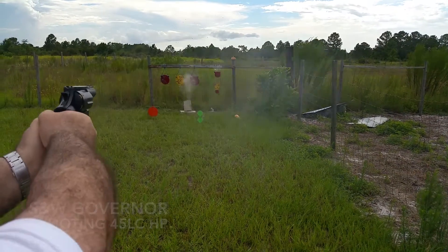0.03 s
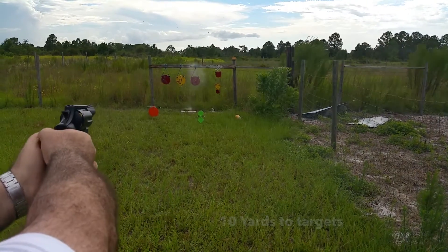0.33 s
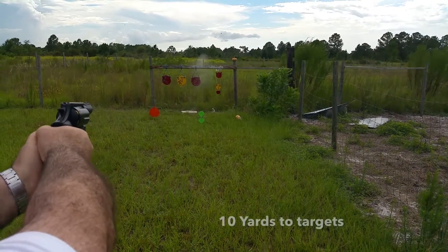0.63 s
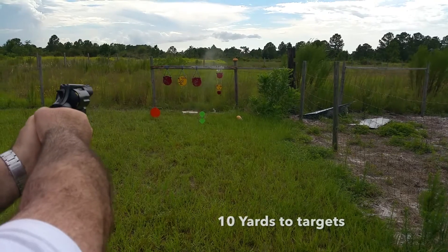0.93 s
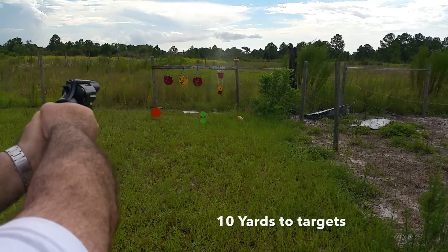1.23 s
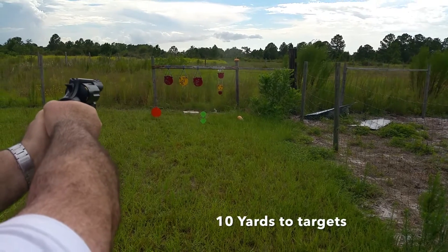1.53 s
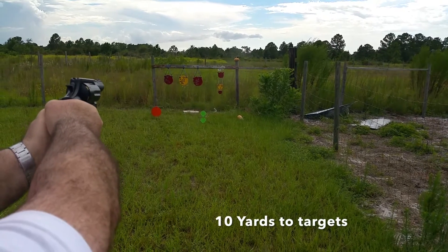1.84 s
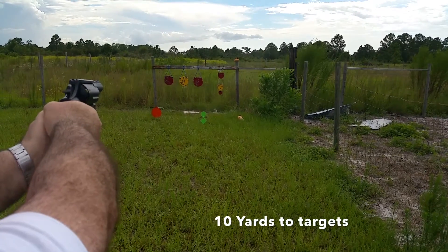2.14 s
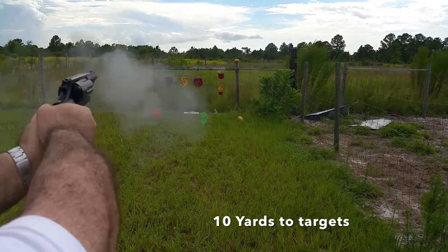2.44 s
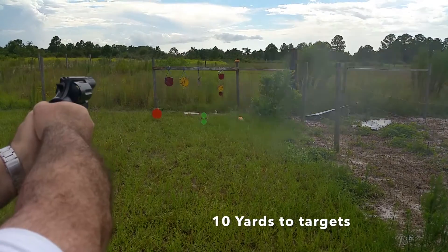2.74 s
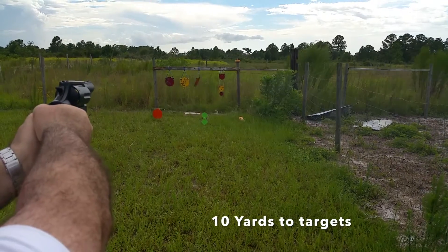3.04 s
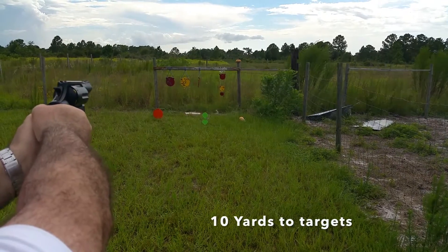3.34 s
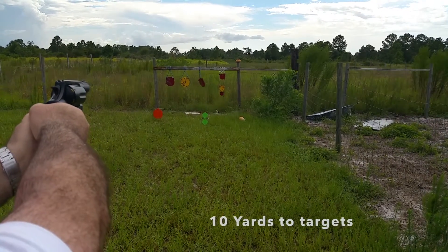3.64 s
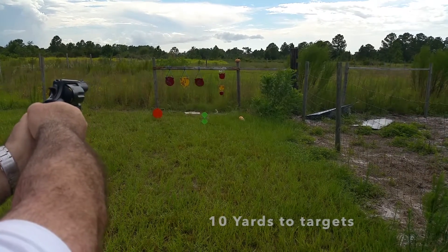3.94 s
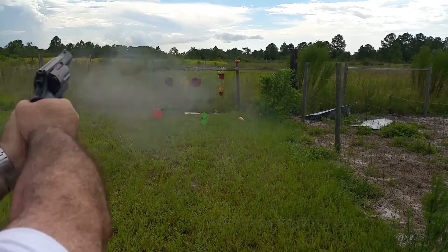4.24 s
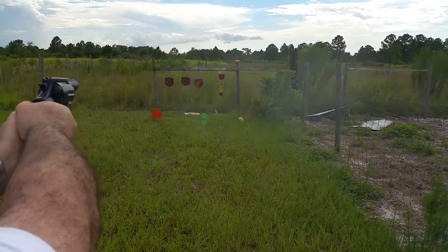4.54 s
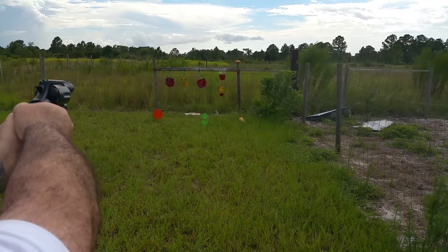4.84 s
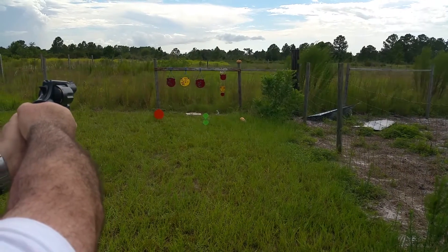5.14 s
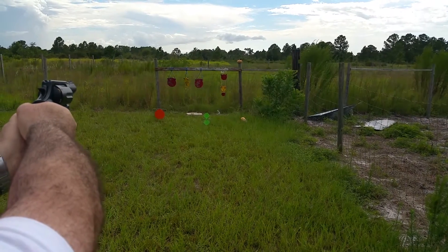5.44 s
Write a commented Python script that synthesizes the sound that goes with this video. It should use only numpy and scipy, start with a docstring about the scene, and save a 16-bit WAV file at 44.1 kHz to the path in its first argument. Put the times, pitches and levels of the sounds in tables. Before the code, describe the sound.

Two revolver shots outdoors, each followed by a ringing steel target, with small gun clicks and wind on the microphone.

```python
"""A revolver shot, fired just before the start, echoes off the brush and far trees of an open field.
Two more shots follow, with clicks of the action between. Their bullets splash on hanging steel plates,
which ring and twist on their chains. Wind buffets the left microphone port, and the camera's
gain control lifts the quiet about a second after each shot."""
import sys
import numpy as np
from scipy import signal
from scipy.fft import rfft, irfft
from scipy.io import wavfile
from scipy.ndimage import uniform_filter1d

SR = 44100
rng = np.random.default_rng(int(sys.argv[2]) if len(sys.argv) > 2 else 0)


def log_audio(samples):
    """Write samples as a 16-bit WAV file to the path given in sys.argv[1]."""
    # one column per channel
    frames = np.atleast_2d(samples).T
    # limit to full scale, then quantise
    limited = np.clip(frames, -1, 1)
    pcm = np.round(limited * 32767).astype(np.int16)
    wavfile.write(sys.argv[1], SR, pcm)


N = 246078
TIME = np.arange(N) / SR


def amp(db):
    """Decibels to gain."""
    return 10 ** (np.asarray(db) / 20)


def unit_rms(x):
    """Scales to rms 1."""
    return x / np.sqrt(np.mean(x ** 2) + 1e-20)


def curves(rows, t):
    """Every column of a table at the times t."""
    times, *columns = np.transpose(rows)
    return [np.interp(t, times, column) for column in columns]


def seconds(length):
    """A time axis."""
    return np.arange(int(length * SR)) / SR


def panned(db):
    """Gains of the two microphone ports, the left louder by db."""
    return unit_rms(amp([[db / 2], [-db / 2]]))


def add(mix, start, sound):
    """Mixes in a stereo sound at start seconds; what falls outside is lost."""
    at = round(start * SR)
    sound = sound[:, max(-at, 0):]
    part = mix[:, max(at, 0):][:, :sound.shape[1]]
    part += sound[:, :part.shape[1]]


def white_pair(n, likeness):
    """White noise at two ports, correlated by likeness."""
    left, other = rng.standard_normal((2, n))
    return np.array([left, likeness * left + np.sqrt(1 - likeness ** 2) * other])


def noise(n, colour, likeness):
    """Stereo noise of rms 1, its spectrum drawn through (Hz, dB) points."""
    hz, db = np.transpose(colour)
    spectrum_db = np.interp(np.log(np.fft.rfftfreq(n, 1 / SR) + 1), np.log(hz + 1), db)
    return unit_rms(irfft(rfft(white_pair(n, likeness)) * amp(spectrum_db), n))


def wobble(t, top_hz):
    """Irregular wavering of rms 1, different at each port."""
    rates = top_hz * np.geomspace(.2, 1, 8)[:, None, None]
    coarse = t[::64]
    slow = np.sin(2 * np.pi * (rates * coarse + rng.random((8, 2, 1)))).sum(0)
    return unit_rms(np.array([np.interp(t, coarse, port) for port in slow]))


def swell(t, rise_s, hold_s, fall_db):
    """Rises, holds until hold_s, then loses fall_db for each tenfold of time."""
    return np.minimum(t / rise_s, 1) * amp(-fall_db * np.log10(np.maximum(t / hold_s, 1)))


def burst(db, hz, t60, skirt_db, likeness):
    """A short dying puff of noise around one frequency."""
    t = np.arange(8192) / SR
    colour = [(hz / 8, 2 * skirt_db), (hz / 1.3, 0), (hz * 1.3, 0),
              (hz * 3, skirt_db), (hz * 20, 2 * skirt_db)]
    return amp(db - 60 * t / t60) * noise(len(t), colour, likeness)


# The blast's two colours at the microphone. Each row: frequency in Hz, relative level in dB.
CRACK_SPECTRUM = [(60, -31), (200, -10.5), (2000, -2), (4500, -2), (6200, -3), (7900, -10), (14700, -7.5),
                  (16000, -22.5)]
BOOM_SPECTRUM = [(30, -39), (70, -20), (250, -12), (520, 2), (1200, -4), (1700, -1.5), (3000, -13.5),
                 (5500, -10), (7300, -25.5), (16000, -22.5)]
def muzzle_blast(crack_db=1, crack_t60=.11, boom_db=.2):
    """A bright crack, then a boom that holds through its bounce off the ground."""
    t = np.arange(12000) / SR
    crack = noise(len(t), CRACK_SPECTRUM, likeness=.1) * amp(crack_db - 60 * t / crack_t60)
    boom = noise(len(t), BOOM_SPECTRUM, likeness=.16) * amp(boom_db)
    boom *= swell(t, rise_s=.0047, hold_s=.018, fall_db=55)
    return (crack + boom) * np.minimum(t / .001, 1)


# Scatter from the grass and brush. Each row: frequency in Hz, relative level in dB.
BRUSH_SPECTRUM = [(30, -43), (70, -10), (250, -2), (650, 0.5), (1200, 3.5), (2000, 4.5), (3400, 1.5),
                  (5900, 3.5), (7300, -5.5), (16000, -13.5)]
# Belts of bushes and trees farther out, each a soft wash.
# Each row: delay in seconds, relative level in dB, rise and t60 in seconds.
TREE_BELT_WASHES = [(.285, -35, 0.029, 0.18), (0.601, -66, 0.26, 2.5), (.92, -65, 0.057, 2.4)]
def field_scatter(brush_db=-22, patchy_db=2, flutter_db=2.5, air_loss_db_per_s=20):
    """The field answers a bang with lumpy scatter that loses treble the farther it has travelled."""
    t = seconds(1.8)
    hz, times, bands = signal.stft(noise(len(t), BRUSH_SPECTRUM, likeness=.067), SR, nperseg=256)
    patches = uniform_filter1d(rng.standard_normal(bands.shape[1:]), size=10, axis=0)
    patches = unit_rms(uniform_filter1d(patches, size=4, axis=1))
    flutter = unit_rms(uniform_filter1d(rng.standard_normal(len(times)), size=3))
    lumps = unit_rms(amp(patchy_db * patches + flutter_db * flutter))
    air_gain = amp(-air_loss_db_per_s * times * (hz[:, None] / 10000) ** 2)  # rate given at 10 kHz
    scatter = signal.istft(bands * lumps * air_gain, SR, nperseg=256)[1][:, :len(t)]
    near = amp(brush_db) * swell(t, rise_s=.04, hold_s=.12, fall_db=53.5)
    far = [np.clip((t - delay) / rise, 0, 1) * amp(db - 60 * np.maximum(t - delay - rise, 0) / t60)
           for delay, db, rise, t60 in TREE_BELT_WASHES]
    return scatter * np.linalg.norm([near, *far], axis=0)


# The revolver, near the microphone. Each row: start in seconds, blast gain in dB, scatter gain in dB.
REVOLVER_SHOTS = [(-0.072, -6.5, 1.5), (2.517, -8, 1.5), (4.2893, -7, 1.5)]
# Single echoes off the target stand, fence and trees, nearest first.
# Each row: delay in seconds, level in dB, centre in Hz, t60 in seconds.
SINGLE_ECHOES = [(.0535, -5, 750, .028), (.078, -20.5, 1200, 0.26), (.086, -19.5, 556.4, 0.044),
                 (.141, -20, 3003, 0.014), (0.2953, -25.5, 1150, 0.017), (.348, -37, 1020, 0.039),
                 (0.479, -49.5, 1600, 0.073), (0.531, -40.5, 1980, .025), (0.867, -56.5, 3280, 0.034),
                 (.923, -60, 3500, .055), (0.963, -51, 1850, 0.031), (1.039, -57, 1820, 0.023),
                 (1.131, -61, 3230, 0.038), (1.222, -62, 2847, 0.029), (1.479, -64, 1620, 0.023)]
def revolver():
    """Each blast reaches the microphone directly, then by way of the field and its hard surfaces."""
    out = np.zeros((2, N))
    for start, blast_db, scatter_db in REVOLVER_SHOTS:
        shot = amp(scatter_db) * field_scatter()
        add(shot, 0, amp(blast_db) * muzzle_blast())
        for delay, db, hz, t60 in SINGLE_ECHOES:
            add(shot, delay, burst(db, hz, t60, skirt_db=-31, likeness=.067))
        add(out, start, shot)
    return out


# The breeze at the microphone. Each row: time in seconds, left and right strength in dB.
BREEZE = [(0, -62.5, -65.5), (.5, -60, -58), (.95, -65.5, -57.5), (1.15, -65.5, -72.5), (1.47, -73.5, -61),
          (1.62, -66.5, -70.5), (2.03, -65, -69.5), (2.2, -69.5, -67.5), (2.5, -73.5, -69.5),
          (2.95, -58.5, -68.5), (3.4, -59.5, -78), (3.76, -57.5, -72.5), (3.92, -41.5, -63),
          (4.2, -48, -59.5), (4.65, -46, -63.5), (4.95, -39, -68.5), (5.3, -48, -69), (5.57, -58.5, -62.5)]
# Gusts on the left port. Each row: peak time in seconds, strength in dB, length in seconds.
LEFT_GUSTS = [(0.402, -51.5, 0.043), (1.607, -50.5, .07), (1.681, -55, 0.031), (1.781, -52.5, 0.062),
              (1.997, -50.5, 0.055), (2.074, -49.5, .04), (2.996, -44.5, .05), (3.175, -42.5, 0.083),
              (3.515, -37, .04), (3.918, -39, .07), (4.11, -37, .09), (4.589, -38.5, .05),
              (4.842, -36.5, .06), (5.243, -37.5, 0.061), (5.403, -35, 0.054), (5.565, -39, .05)]
def wind_strength(t, lee_db=-27):
    """Breeze plus bell-shaped gusts, in dB at each port; the right one lies in the lee."""
    gusts = sum(amp(db) * np.exp(-2 * ((t - peak) / length) ** 2) for peak, db, length in LEFT_GUSTS)
    return 20 * np.log10(np.hypot(amp(curves(BREEZE, t)), amp([[0], [lee_db]]) * gusts))


def wind(gain_db=-1, lumpy_db=4, low_hz=50, high_hz=150, db_per_octave=20):
    """Lumpy turbulence right at the ports; a stronger gust lies higher in pitch."""
    hz, times, bands = signal.stft(white_pair(N, likeness=0), SR, nperseg=1024, noverlap=768)
    hz = hz[:, None]
    strength_db = wind_strength(times)
    level_db = np.array([np.interp(TIME, times, port) for port in strength_db])
    level_db += gain_db + lumpy_db * wobble(TIME, top_hz=26)
    speed = 2 ** ((strength_db[:, None] + 50) / db_per_octave)  # moves both band edges; 1 at -50 dB
    low_cut = (hz / np.hypot(hz, low_hz * np.maximum(speed, 1) ** .92)) ** 2
    shape = low_cut / np.hypot(1, (hz / (high_hz * speed)) ** 3.28)
    shape /= np.linalg.norm(shape, axis=1, keepdims=True)
    rumble = signal.istft(bands * shape, SR, nperseg=1024, noverlap=768)[1][:, :N]
    return amp(level_db) * unit_rms(rumble)


# The air all round the microphone. Each row: frequency in Hz, relative level in dB.
AIR_SPECTRUM = [(30, 3.5), (200, -1.5), (500, 0), (900, 1.5), (2500, -4.5), (4000, -6.5), (5800, -3.5),
                (7500, -8.5), (16000, -12)]
def open_air(level_db=-80):
    """The faint, steady hiss of the open field."""
    return amp(level_db) * noise(N, AIR_SPECTRUM, likeness=.16)


# A light tap on steel downrange. Each row: mode in Hz, relative level in dB, t60 in seconds.
PING_MODES = [(1179, -8, 0.41), (3080, -16.5, 0.58), (4900, -3.5, 0.24), (5071, -11, 0.31), (6100, -6, 0.2),
              (7130, -16, 0.51), (12300, -22, 0.38), (13100, -15, 0.25)]
def fragment_ping(gain_db=-51.5):
    """A falling fragment sets a plate ringing briefly."""
    t = seconds(.94)
    ping = sum(amp(db - 60 * t / t60) * np.sin(2 * np.pi * hz * t) for hz, db, t60 in PING_MODES)
    return amp(gain_db) * panned(0) * ping


# Trigger, cylinder and hammer close by, and lead meeting steel downrange.
# Each row: start in seconds, level in dB, centre in Hz, t60 in seconds.
METAL_CLICKS = [(0.5396, -38.5, 4500, 0.0095), (1.2382, -52.5, 5000, 0.0094), (1.649, -60, 4000, 0.008),
                (1.907, -65, 4000, 0.02), (2.1367, -51.5, 5600, 0.0082), (2.511, -44.5, 3500, 0.016),
                (2.512, -45.5, 4000, 0.01), (2.5955, -12, 5500, 0.016), (4.222, -50, 4600, 0.01),
                (4.2835, -35, 4500, 0.011), (4.3631, -7.5, 4450, 0.013)]
def metal_clicks():
    """Metal strikes metal in sharp, bright ticks."""
    out = np.zeros((2, N))
    for start, db, hz, t60 in METAL_CLICKS:
        add(out, start, burst(db, hz, t60, skirt_db=-24.5, likeness=.53))
    return out


def shimmer(partial_db=-36, t60=.36, spread_db=4, waver_db=4):
    """The dense, short-lived highest partials of a struck plate."""
    t = seconds(.55)
    out = np.zeros((2, len(t)))
    for place, size in rng.random((26, 2)):
        hz = 6500 + 9000 * place
        db = partial_db + spread_db * (2 * size - 1) + waver_db * wobble(t, top_hz=25)
        out += amp(db - 60 * t / t60) * np.sin(2 * np.pi * (hz * t + rng.random((2, 1))))
    return out


def plate(modes, twist, swells, gain_db, waver_db=3, port_lag_s=.00003, edge_on_gain=.11):
    """A struck plate twists on its chains, sweeping the beams of its modes past the microphone."""
    t = seconds(2)
    struck = twist[0][0]
    half_turns, = curves(twist, t + struck)
    mid_db, high_db = curves(swells, t + struck)
    port_time = t - np.array([[0], [port_lag_s]])
    family_hz = [3200, 4800, 5100, 7000]
    out = np.zeros((2, len(t)))
    for k, (hz, db, t60, pan_db) in enumerate(modes):
        # the two strong mode families have broad beams; higher modes sweep past in many narrow ones
        mid = np.interp(hz, family_hz, [1, 0, 0, 0])
        high = np.interp(hz, family_hz, [0, 1, 1, 0])
        narrow = np.interp(hz, family_hz, [.8, .9, .9, 1.6])
        beam = amp(mid * mid_db + high * high_db + narrow * waver_db * wobble(t, top_hz=28))
        phase = 2 * np.pi * (hz * port_time + rng.random())
        if k == 0:  # the lowest mode falls nearly silent edge-on
            tone = np.sin(np.pi * half_turns) * np.sin(phase) + edge_on_gain * np.cos(phase)
        else:
            tone = beam * np.sin(phase)
        out += panned(pan_db) * amp(gain_db + db - 60 * t / t60) * tone
    add(out, 0, shimmer())
    return out


# The two plates downrange.
# Each row: mode in Hz, relative level in dB, t60 in seconds, left over right in dB.
FIRST_MODES = [(791, -29.5, 3.8, -3), (1674, -33, .7, 0), (2638, -29, .6, 0), (3033, -23, .72, 0),
               (3080, -15, .72, 3), (3748, -23, .25, 0), (3851, -26, .35, 0), (4841, -14, .64, -7),
               (4884, -29, .6, -3), (5037, -21, .7, -6), (5937, -23, .4, 0), (6031, -22, .4, 0),
               (7120, -33, .75, 0), (7700, -30, .45, 0), (8457, -38, .7, 0), (11520, -35, .5, 0),
               (14700, -21, .15, 0)]
SECOND_MODES = [(797, -31, 3.5, -3), (1175, -25, .4, 0), (2649, -40, 1.5, 0), (3047, -33, .65, 0),
                (3106, -27, .62, 1), (3800, -23, .25, 0), (4905, -17, .88, -5), (4921, -47, 2.6, -3),
                (5060, -31, .65, -3), (6068, -18, .4, 0), (6578, -36, .6, 0), (7160, -32, .75, 0),
                (7779, -31, .62, 0), (9022, -32, .4, 0), (10450, -36, .45, 0)]
# Their twist from the strike on, edge-on to the microphone at each whole number.
# Each row: time in seconds, angle in half turns.
FIRST_TURNS = [(2.595, -.3), (2.66, 0), (2.865, 1), (2.92, 1.22), (3.17, 1.68), (3.5, 2), (3.68, 2.3),
               (3.88, 2.58), (4.08, 3)]
SECOND_TURNS = [(4.3635, -.3), (4.385, 0), (4.505, 1), (4.825, 3), (4.93, 3.45), (5.07, 3.78), (5.57, 3.68)]
# The ring swells and dips as they move.
# Each row: time in seconds, gain in dB of the modes up to about 3 kHz, then of those near 5 kHz.
FIRST_SWELLS = [(2.595, -12, -2), (2.66, 2, 11), (2.72, 12, -1), (2.76, 10, 2), (2.83, -6, -1),
                (2.89, 3, -7), (3.02, 8, 6), (3.13, -4, 1), (3.3, 7, 4)]
SECOND_SWELLS = [(4.3635, -1, 3), (4.395, 0, -2), (4.44, 3, 14), (4.48, 3, 0), (4.53, -1, -7),
                 (4.595, 2, 9), (4.645, -2, -7), (4.715, 1, 6), (4.75, -1, -8), (5.57, 0, -3)]
def hanging_plates():
    """The second and third bullets each set one plate ringing."""
    out = np.zeros((2, N))
    add(out, FIRST_TURNS[0][0], plate(FIRST_MODES, FIRST_TURNS, FIRST_SWELLS, gain_db=-.5))
    add(out, SECOND_TURNS[0][0], plate(SECOND_MODES, SECOND_TURNS, SECOND_SWELLS, gain_db=-.35))
    return out


# Lead spraying the target stand. Each row: start in seconds, level in dB, hold in seconds.
LEAD_SPLASHES = [(2.5964, -14.5, 0.041), (2.652, -25, 0.019), (4.361, -13.5, 0.0061), (4.413, -18, 0.023)]
# The spray's colour. Each row: frequency in Hz, relative level in dB.
SPLASH_SPECTRUM = [(30, -35.5), (90, -2), (300, 0), (1200, 1), (2200, 0.5), (4000, -1), (6000, -6),
                   (7500, -21.5), (15000, -9)]
def lead_splashes(t60=.057):
    """Lead bursts on steel; the fragments hiss for a moment and die away."""
    t = np.arange(16384) / SR
    out = np.zeros((2, N))
    for start, db, hold in LEAD_SPLASHES:
        envelope = amp(db - 60 * np.maximum(t - hold, 0) / t60)
        add(out, start, envelope * noise(len(t), SPLASH_SPECTRUM, likeness=.2))
    return out


def brush_echo(steel, wet_db=-26, low_cut_hz=1800):
    """The field scatters the treble of the steel back to the microphone."""
    response = signal.sosfilt(signal.butter(4, low_cut_hz, "high", fs=SR, output="sos"), field_scatter())
    response *= amp(wet_db) / np.linalg.norm(response[0])
    return signal.fftconvolve(steel, response, axes=1)[:, :N]


# Single eddies on the left port.
# Each row: time in seconds, level in dB, half width in seconds, left over right in dB.
PORT_EDDIES = [(3.51, -31, 0.00052, 32), (3.9006, -18, 0.00053, 70), (4.0482, -26.5, 0.00037, 52.5),
               (4.109, -42, 0.00064, 31), (4.121, -26.5, 0.00057, 42), (4.1397, -27, 0.00049, 43),
               (4.19, -32.5, 0.00056, 37), (4.213, -35.5, 0.00076, 39), (4.272, -27, 0.00048, 33),
               (5.383, -49, 0.00057, 24.5), (5.545, -21.5, 0.00066, 40)]
def eddies():
    """A passing eddy thumps the microphone: suction, then pressure."""
    t = np.arange(-1000, 1000) / SR
    out = np.zeros((2, N))
    for centre, db, width, pan_db in PORT_EDDIES:
        thump = t / width / np.cosh(t / width)
        add(out, centre + t[0], amp(db) * panned(pan_db) * thump)
    return out


def tree_line(steel, trees_db=-56, delay_s=1.25, depth_s=.16, dull_hz=6500, count=8):
    """Trees some 200 metres off return a dull, late echo; stirring leaves blur its pitch."""
    dull = signal.sosfilt(signal.butter(2, dull_hz, fs=SR, output="sos"), steel)
    dull *= amp(trees_db) / np.sqrt(count)
    out = np.zeros((2, N))
    for delay in np.linspace(delay_s, delay_s + depth_s, count):
        add(out, delay, dull * wobble(TIME, top_hz=70))
    return out


def scene():
    """The field from beside the shooter: gun close by, steel downrange, wind on the microphone."""
    steel = hanging_plates() + lead_splashes()
    add(steel, start=.539, sound=fragment_ping())
    downrange = steel + brush_echo(steel) + tree_line(steel)
    return downrange + wind() + eddies() + open_air() + revolver() + metal_clicks()


def record(dry, lift_db=14, loud_db=-21, hold_s=.82, recover_db_per_s=35, low_hz=25, edge_hz=16200):
    """The camera's gain drops at a loud sound, holds and climbs back; peaks overload; the top is cut."""
    power = uniform_filter1d((dry ** 2).mean(0), size=200, origin=70)
    power_db = 10 * np.log10(abs(power) + 1e-12)
    last_loud = np.maximum.accumulate(np.where(power_db > loud_db, TIME, 0))
    gain_db = np.clip((TIME - last_loud - hold_s) * recover_db_per_s, 0, lift_db)
    low_cut = signal.sosfilt(signal.butter(2, low_hz, "high", fs=SR, output="sos"), dry)
    lifted = low_cut * amp(uniform_filter1d(gain_db, size=40))
    clipped = lifted / (1 + lifted ** 8) ** (1 / 8)
    band_limit = signal.firwin(511, edge_hz, window=("kaiser", 9), fs=SR)
    return signal.oaconvolve(clipped, band_limit[None], "same")


dry = scene()
out = record(dry)
log_audio(out)
```